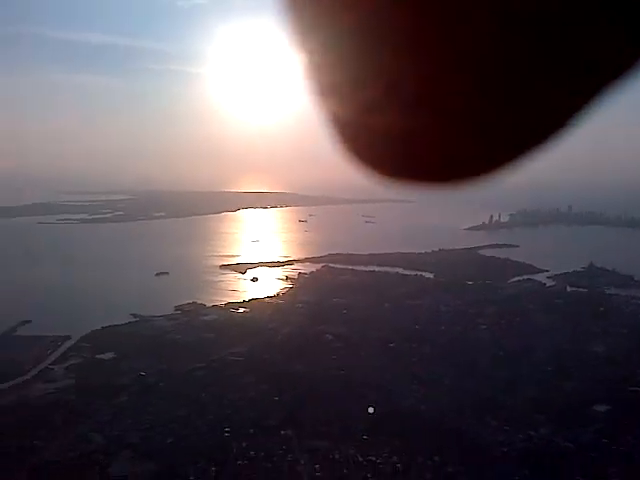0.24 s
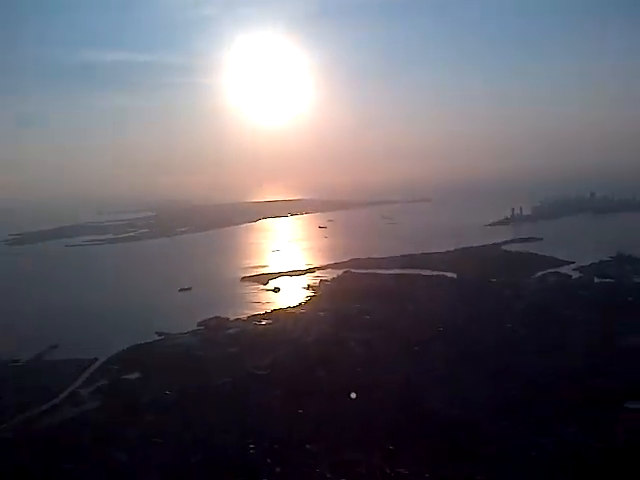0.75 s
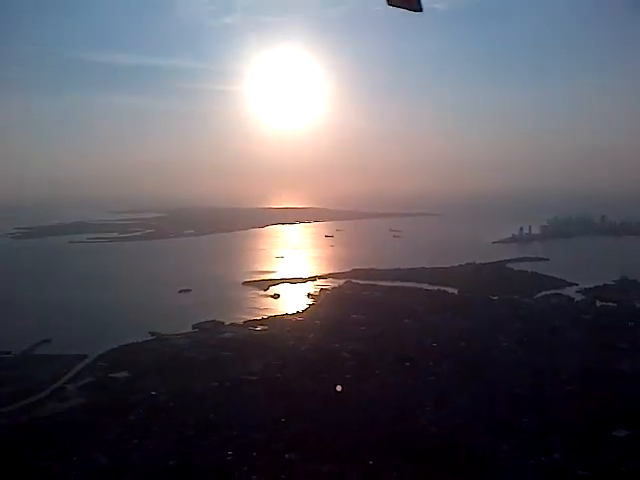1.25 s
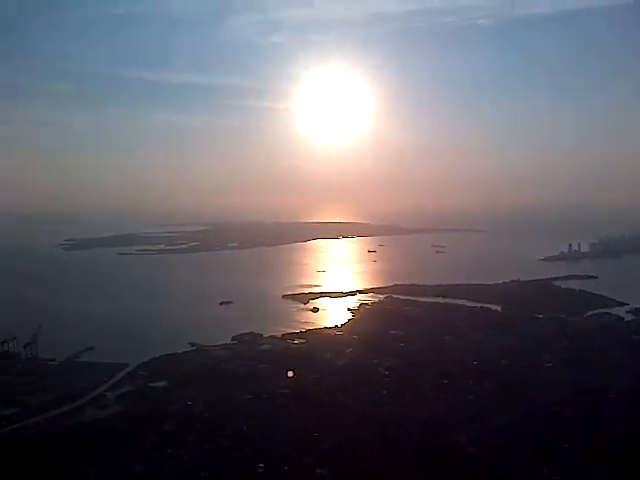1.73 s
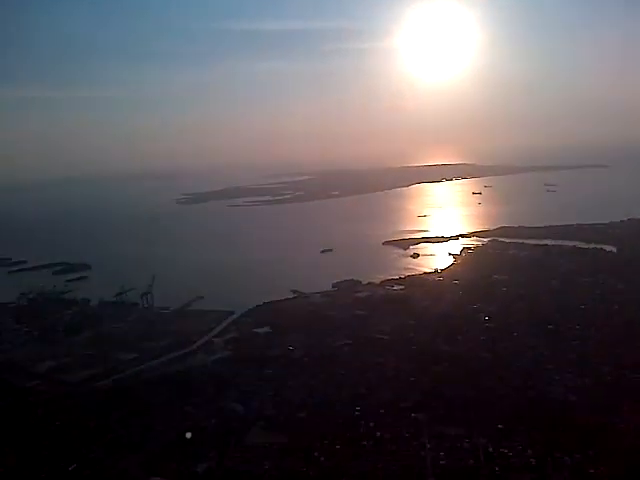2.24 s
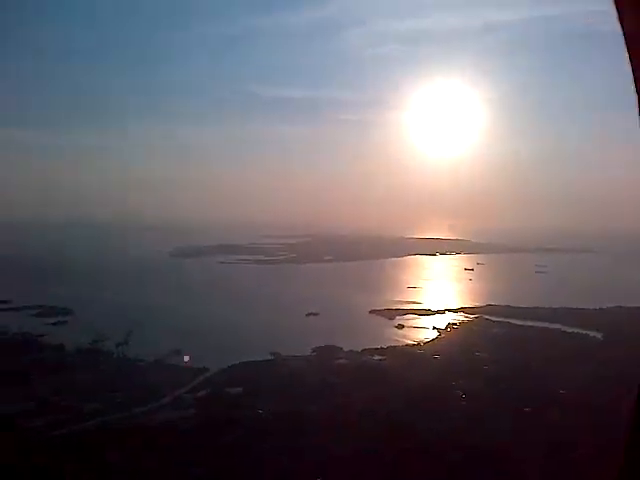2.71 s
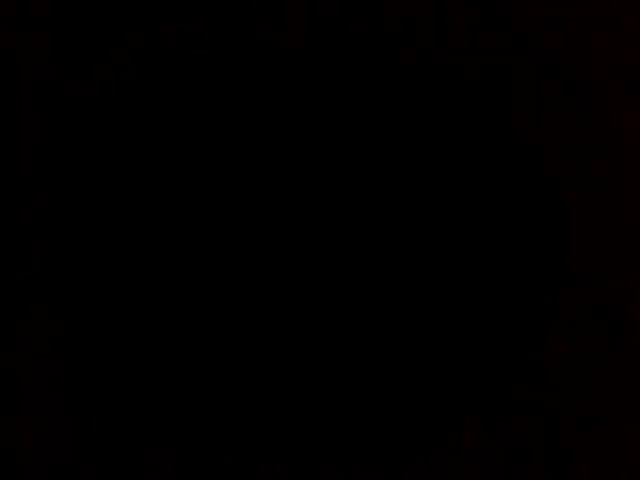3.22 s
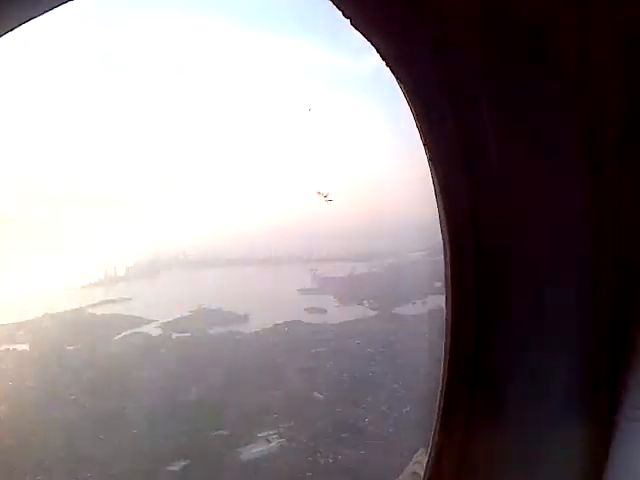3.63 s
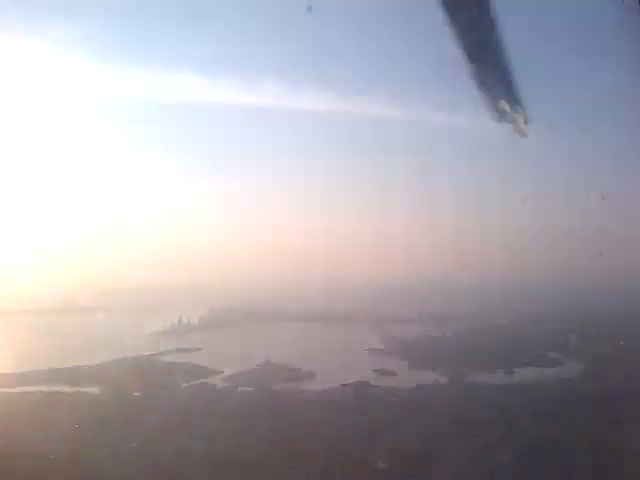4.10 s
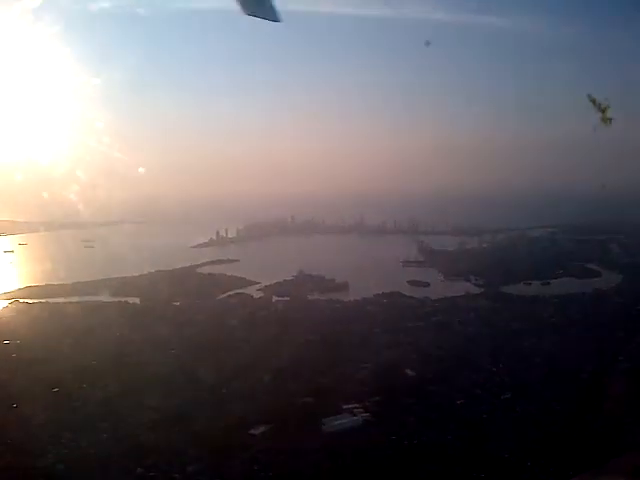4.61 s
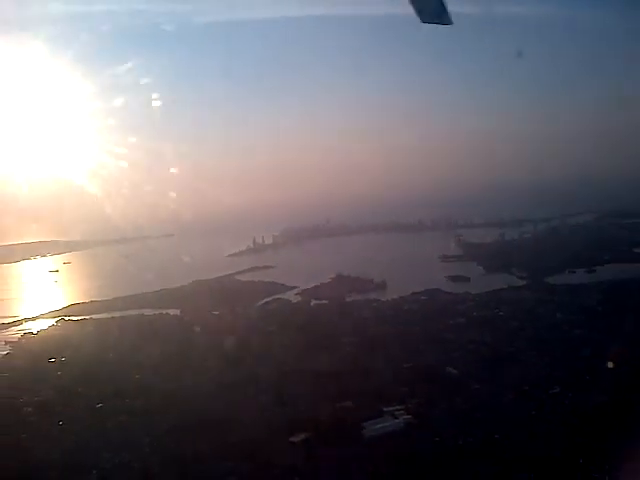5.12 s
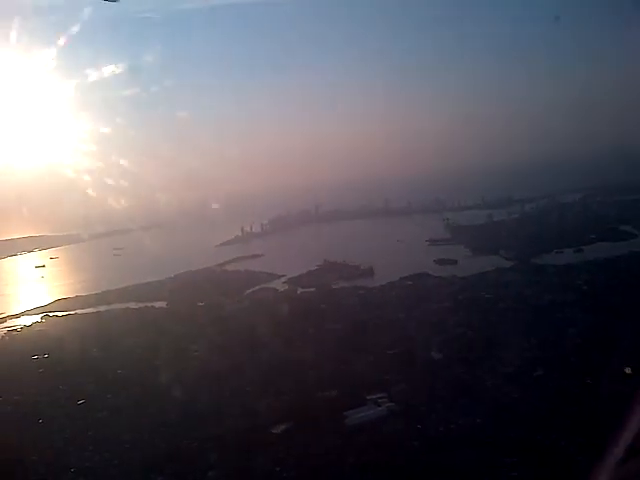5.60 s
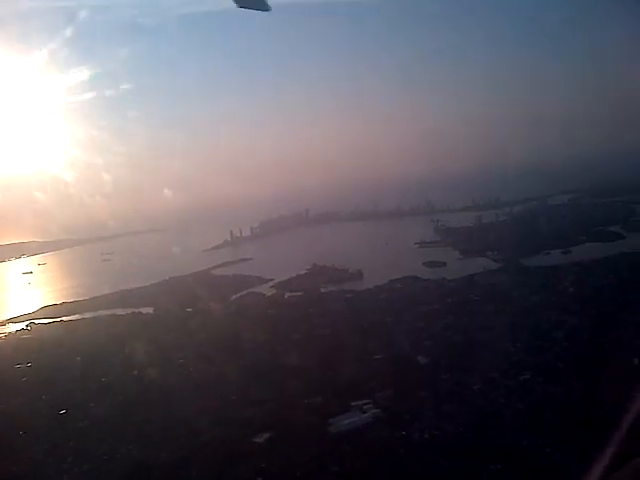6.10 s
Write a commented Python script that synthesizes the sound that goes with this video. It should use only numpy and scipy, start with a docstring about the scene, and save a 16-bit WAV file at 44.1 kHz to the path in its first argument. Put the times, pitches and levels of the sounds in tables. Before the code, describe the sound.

Harsh warbling electronic whistles, crackles and gusty rumble for three seconds, suddenly clearing to steady helicopter rotor thump, gear whine and airflow roar.

```python
"""Inside a helicopter cabin: blade passes ring the shell under a shaft hum, gears whine as wavering
sines, turbine and airflow roar as shaped noise. For the first 3.3 s or so a draught and a gripping
hand press on the phone's microphone port: the input jams at full scale, snaps, drops out and breaks
into full-level whistles whose pitch follows the excess pressure."""
import sys
import numpy as np
from scipy import signal
from scipy.fft import rfft, irfft
from scipy.io import wavfile
from scipy.ndimage import uniform_filter1d, minimum_filter1d

SR = 44100
rng = np.random.default_rng(int(sys.argv[2]) if len(sys.argv) > 2 else 0)


def level_to_linear(level):
    """Convert decibel levels to linear amplitude factors, elementwise."""
    exponent = np.asarray(level, float) / 20
    return 10 ** exponent


def put_to_file(sound):
    """Save the sound as 16-bit audio at rate SR, in the file named by the first command-line argument."""
    columns = np.atleast_2d(sound).T  # one column per channel
    safe = np.clip(columns, -1, 1)
    whole_steps = np.round(safe * 32767)
    wavfile.write(sys.argv[1], SR, whole_steps.astype(np.int16))


N = 280035
T = np.arange(N) / SR

# long squeals while the pressure stays past full scale, one table each: (time [s], pitch [Hz])
SQUEALS = [
    [(0.0, 4050), (0.013, 3300), (0.027, 2050), (0.038, 4600), (0.049, 2700), (0.065, 3750), (0.075, 6700),
     (0.088, 7700), (0.116, 6500), (0.141, 4200), (0.16, 4000), (0.168, 2950), (0.181, 6200), (0.198, 5400),
     (0.208, 3800), (0.219, 5800), (0.23, 5300), (0.248, 3300), (0.26, 3700), (0.271, 4900), (0.289, 3250),
     (0.303, 4350), (0.313, 3550), (0.327, 3400), (0.337, 4450), (0.343, 3200), (0.35, 990)],
    [(1.203, 1160), (1.213, 1800), (1.233, 4780), (1.247, 3500), (1.255, 4480), (1.268, 4350),
     (1.274, 3100), (1.288, 2540), (1.294, 1120)],
    [(1.437, 800), (1.442, 700), (1.45, 2330), (1.457, 1380), (1.469, 3320), (1.48, 3450), (1.486, 5170),
     (1.494, 3140), (1.506, 3320), (1.517, 700)],
    [(1.524, 1120), (1.53, 2200), (1.543, 2280), (1.548, 1800), (1.555, 3060), (1.561, 2000), (1.594, 1900),
     (1.601, 3000), (1.608, 1700), (1.624, 520)],
]


def unit(x):
    """Scale to rms 1."""
    return x / np.sqrt(np.mean(x ** 2))


def colour(x, points):
    """Filter by a spectrum of (frequency [Hz], gain [dB]) points, joined over log frequency."""
    hz, db = np.transpose(points)
    bins_hz = np.arange(N // 2 + 1) * SR / N + 1
    gain = level_to_linear(np.interp(np.log(bins_hz), np.log(hz), db))
    return irfft(rfft(x) * gain, N)


def ring(x, hz, width_hz):
    """One resonance, gain 1 at its centre."""
    b, a = signal.iirpeak(hz, hz / width_hz, SR)
    return signal.lfilter(b, a, x)


def walk(rate_hz):
    """Random levels held 1 / rate_hz s and smoothed twice; rms about 1."""
    hold = int(SR / rate_hz)
    steps = np.repeat(rng.standard_normal(N // hold + 1), hold)
    smooth = uniform_filter1d(uniform_filter1d(steps, hold), hold)
    return unit(smooth)[:N]


def columns(table):
    """Every column of a time table, one value per sample."""
    s, *rest = np.transpose(table)
    return [np.interp(T, s, column) for column in rest]


def draught():
    """Air rushing over the port: wavering shaped noise, with the room left under full scale."""
    # (time [s], rush level [dB], room left under full scale [full scale])
    course = [(0, -30, 0.35), (.35, -10.5, 0.5), (.5, -19.5, 0.9), (.72, -14.5, 0.33), (1.08, -15.5, 0.3),
              (1.3, -11, 0.3), (1.4, -18, 0.34), (1.64, -20.5, 0.62), (1.9, -14.5, 0.28), (2.15, -12, 0.21),
              (2.3, -14, 0.18), (2.57, -12.5, 0.07), (2.7, -33, 0), (2.83, -15, 0.26), (2.92, -18.5, 0.23),
              (3.07, -10, .1), (3.25, -22, 0.38), (3.29, -29, 1), (3.5, -44, 2.9)]
    # rush spectrum: (frequency [Hz], relative density [dB])
    spectrum = [(40, 4), (170, -1), (400, -9), (950, -14.5), (1400, -19), (2300, -20.5), (3700, -24.5),
                (4400, -32.5), (6100, -31.5), (7500, -51.5)]
    rush_db, room = columns(course)
    noise = unit(colour(rng.standard_normal(N), spectrum))
    return level_to_linear(rush_db + 2.6 * walk(39.91)) * noise, room


def silences():
    """True while the jammed input goes silent."""
    # (time [s], length [ms])
    dropouts = [(0.445, 6), (0.825, 6), (1.071, 7), (1.097, 12), (1.115, 6), (1.157, 10), (1.195, 8),
                (1.405, 6), (2.045, 5), (2.189, 6), (2.249, 8), (2.306, 11), (2.416, 6), (2.463, 4.5),
                (2.571, 10), (2.585, 8), (2.599, 17), (2.672, 25), (2.709, 14), (2.726, 5), (2.809, 9),
                (2.843, 8), (2.861, 7), (2.936, 9), (2.963, 23), (3.044, 26), (3.076, 55), (3.134, 23),
                (3.222, 11), (3.237, 6), (3.263, 9)]
    return sum((T >= s) & (T < s + length_ms / 1000) for s, length_ms in dropouts) > 0


def pitch():
    """Whistle pitch: squeals as drawn; surges and chirps level off with excess pressure."""
    # single surges of pressure: (time [s], rise [ms], fall [ms], peak excess [full scale])
    surges = [(.405, 7.27, 14, 0.19), (.421, 7.3, 8, 0.3), (.489, 4.67, 8, .22), (.504, 12, 45, .37),
              (.584, 3, 8, .16), (.590, 36, 53, 2.1), (.682, 8.4, 13, 0.22), (.953, 25, 24, 1.45),
              (1.002, 23, 36, 1.3), (1.167, 16, 9, .28), (1.330, 7, 7, .18), (2.468, 5.32, 8, .2),
              (2.473, 29, 49, 1.3), (2.616, 62.3, 124, 2.02), (2.869, 8, 9, 0.18), (2.991, 110, 114, 2.4)]
    # chirps as the pressure just grazes full scale: (time [s], length [ms])
    chirps = [(0.36, 6), (0.387, 3.8), (.396, 4.9), (.453, 7.4), (.942, 9.5), (1.062, 6.7), (1.728, 4.7),
              (2.341, 5.1), (2.395, 3.5), (2.402, 4.9), (2.854, 4), (3.272, 10)]
    # a whistle catches at one excess and dies at a lower one
    catch, release = .135, .07
    # both under half the sampling rate, or at it
    ceiling_hz, top_hz = 8000, 7750
    excess = np.zeros(N)
    for s, rise_ms, fall_ms, peak in surges:
        corners_s = s + np.cumsum([0, rise_ms, fall_ms]) / 1000
        excess = np.maximum(excess, np.interp(T, corners_s, [catch, peak, release], 0, 0))
    for s, length_ms in chirps:
        ramp = np.interp(T, [s, s + length_ms / 1000], [catch, release], 0, 0)
        excess = np.maximum(excess, ramp)
    hz = ceiling_hz * np.tanh(excess * level_to_linear(0.8 * walk(160)))
    squeals_hz = sum(np.interp(T, *np.transpose(table), 0, 0) for table in SQUEALS)
    # the unsteady grip makes long squeals jag up and down
    return np.minimum(hz + squeals_hz * level_to_linear(.75 * walk(480)), top_hz)


def whistles(hash_db=-29, sample_hz=16000):
    """Past full scale the converter oscillates; sampled coarsely, its overtones fold back as hash."""
    # (multiple of the pitch, level [dB])
    shape = [(1, -6.5), (2, -18.5), (3, -20.5), (5, -21.5)]
    # gain of each squeal [dB]
    squeal_db = [1, -1.1, -1.4, -1.5]
    hz = pitch()
    on = (hz > 0) & ~silences()
    # turbulence and cabin sound shake the excess: pitch flutters, single cycles stumble
    flutter_hz = (60 + .05 * hz) * walk(900) + 80 * walk(3000)
    turns = np.cumsum(on * (hz + flutter_hz)) / SR
    tone = sum(level_to_linear(db) * np.sin(2 * np.pi * k * turns) for k, db in shape)
    # the swing shrinks as the pitch nears half the sampling rate
    swing = on * np.clip((8300 - hz) / 2600, 0, 1)
    for table, db in zip(SQUEALS, squeal_db):
        inside = (T >= table[0][0]) & (T <= table[-1][0])
        swing = swing * np.where(inside, level_to_linear(db), 1)
    whistle = swing * (tone + level_to_linear(hash_db) * rng.standard_normal(N))
    held = (np.floor(T * sample_hz) * SR / sample_hz).astype(int)
    return whistle[held], on


def slip_list():
    """Times and peaks of the snaps as a jam slips: the listed ones and a random scatter."""
    # (time [s], peak [dB])
    listed = [(0.372, -2), (0.382, -4.5), (0.758, -3.5), (0.789, -13), (0.852, -5), (0.939, -7),
              (1.095, -8), (1.127, -4), (1.305, -6.5), (1.428, -4.5), (1.859, -6), (1.915, -7.5),
              (2.05, -3.5), (2.097, -7), (2.11, -5.5), (2.156, -2.5), (2.201, -10), (2.206, -11),
              (2.216, -0.5), (2.461, -7.5)]
    chance = rng.random((14, 2))
    start_s, end_s = .7, 2.45
    s = start_s + (end_s - start_s) * chance[:, 0]
    db = -3.5 - 11 * chance[:, 1]
    return list(listed) + list(zip(s, db))


def snaps(slips, width_ms=.32):
    """Short downward jerks of the input, each a Gaussian pulse."""
    out = np.zeros(N)
    for s, db in slips:
        near = slice(int(s * SR) - 100, int(s * SR) + 100)
        out[near] -= level_to_linear(db) * np.exp(-.5 * ((T[near] - s) * 1000 / width_ms) ** 2)
    return out


def jam_surge(jam, room):
    """Pressure that pins the input: builds over 3 ms, deepens in the middle of long jams."""
    jam = jam * 1.
    build = uniform_filter1d(jam, size=130) * (room + .22)
    deepening = minimum_filter1d(uniform_filter1d(jam, size=300), size=1150)
    return build + 0.73 * deepening


def roar():
    """Turbine and airflow: broad shaped noise, slightly wavering."""
    # (frequency [Hz], relative density [dB])
    spectrum = [(30, -2), (85, -3), (250, -5.5), (400, -12), (800, -18.5), (1150, -22), (1500, -18.5),
                (2150, -22.5), (2500, -19.5), (3600, -30), (6300, -40.5), (7500, -68.5)]
    return unit(colour(rng.standard_normal(N), spectrum)) * level_to_linear(0.61 * walk(12))


def gears(window, waver_db=2, drift_rad=.9):
    """Meshing tones, each wavering alone; turning the phone trades one set for another."""
    # gear and shaft tones [Hz]
    tones_hz = [695, 939, 996, 1023, 1058, 1238, 1370, 1593, 1734, 1778, 1875, 1908, 1992, 2081, 2206, 2425,
                2480, 2505, 2632, 2797, 3128, 3414, 3732]
    # their levels: (behind the door pillar [dB], at the window [dB])
    levels = [(-37.5, -45), (-35, -40.5), (-51, -43), (-44, -33), (-51, -45.5), (-52, -55.5), (-52, -33),
              (-48.5, -48.5), (-46, -30.5), (-48, -34.5), (-54, -34), (-43.5, -35.5), (-48, -38.5),
              (-47.5, -32), (-44.5, -35.5), (-52.5, -46.5), (-48, -38.5), (-52.5, -39.5), (-52, -41),
              (-46, -35), (-50, -47), (-52, -38), (-54.5, -43)]
    out = 0
    for hz, (pillar_db, window_db) in zip(tones_hz, levels):
        db = pillar_db + window * (window_db - pillar_db) + waver_db * walk(3.14)
        phase = drift_rad * walk(8) + 2 * np.pi * rng.random()
        out = out + np.sqrt(2) * level_to_linear(db) * np.sin(2 * np.pi * hz * T + phase)
    return out


def rotor(blade_hz=16.3, hum_hz=255.6, hum_db=-3, waver_db=3):
    """Blade passes and buffeting air ring the cabin shell; a shaft hums above them."""
    # cabin resonances: (frequency [Hz], width [Hz], level [dB])
    resonances = [(105.6, 7.5, -0.5), (146.1, 9.4, -8.5), (172, 27.5, 5), (218, 75, -1), (302.7, 25, -11)]
    passes = np.diff(np.floor(blade_hz * T + .12), prepend=0) * level_to_linear(1.5 * walk(16))
    # a blade pass is a soft push of a couple of milliseconds
    pushes = unit(np.convolve(passes, np.hanning(110), "same"))
    drive = pushes + level_to_linear(-15.5) * rng.standard_normal(N)
    shell = 0
    for hz, width_hz, db in resonances:
        shell = shell + level_to_linear(db) * unit(ring(ring(drive, hz, width_hz), hz, 3 * width_hz))
    hum = level_to_linear(hum_db + waver_db * walk(12)) * np.sin(2 * np.pi * hum_hz * T + .5 * walk(6))
    return unit(unit(shell) + hum)


def cabin():
    """Rotor, roar and gears, rebalanced as the phone turns toward the window."""
    # (time [s], thump and hum level [dB], roar level [dB], share of the window view [0-1])
    course = [(3.3, -32, -27.5, 0), (3.6, -26, -22.5, 0.07), (3.9, -17.5, -21, 0.38), (4.1, -17, -19, 0.62),
              (4.5, -14.5, -17, 0.77), (4.9, -12, -17.5, 0.82), (5.3, -16, -17.5, 0.85),
              (5.7, -13.5, -17.5, 0.74), (6.0, -14.5, -17, 0.86), (6.35, -17.5, -17.5, 0.8)]
    thump_db, roar_db, window = columns(course)
    return level_to_linear(thump_db) * rotor() + level_to_linear(roar_db) * roar() + gears(np.clip(window, 0, 1))


def scene(knee=.06):
    """All sound rides on the slow port pressure; whatever passes full scale is squeezed flat."""
    rush, room = draught()
    whistle, whistling = whistles()
    jam = whistling | silences()
    slips = slip_list()
    for s, _ in slips:
        # each snap leaves the input stuck for an instant
        jam = jam | ((T >= s + .001) & (T < s + .0035))
    eddies = 0.27 * walk(150) * np.clip(1.2 - room, 0, 1)
    excess = cabin() + rush + eddies + jam_surge(jam, room) - room
    squeezed = room - knee * np.logaddexp(0, -excess / knee)
    return (squeezed + whistle + snaps(slips))[None]


def low_pass(x):
    """Removes everything above the highest recorded frequency."""
    return signal.sosfilt(signal.butter(12, 7790, fs=SR, output="sos"), x)


def record(dry):
    """A rumble filter, rounded peaks and the treble roll-off of a narrow input."""
    # input roll-off: (frequency [Hz], gain [dB])
    roll_off = [(500, 2), (2500, 0.5), (4500, -2.5), (6000, -9.5), (7000, -13.5), (7700, -35), (8300, -66)]
    rumble_cut = signal.butter(2, 215, "highpass", fs=SR, output="sos")
    thinned = signal.sosfilt(rumble_cut, dry[0] - dry[0, 0])
    rounded = .8 * np.tanh(thinned / .8)
    return low_pass(colour(rounded, roll_off)[None])


dry = scene()
out = record(dry)
put_to_file(out)
```